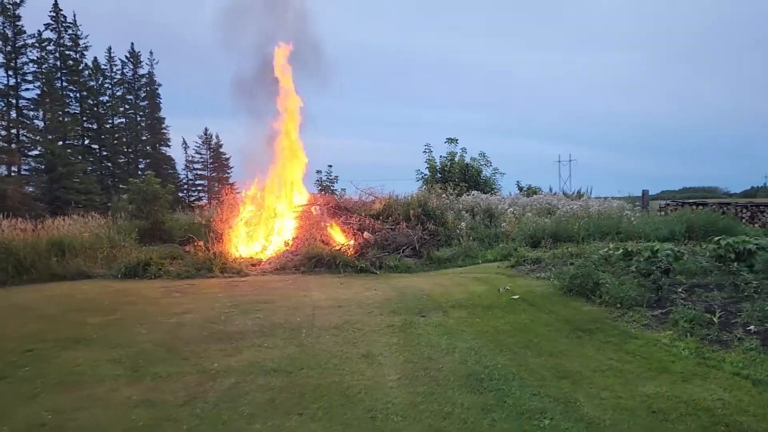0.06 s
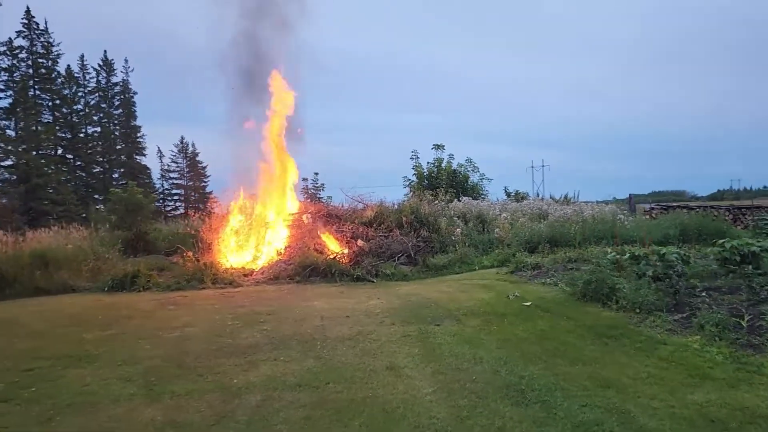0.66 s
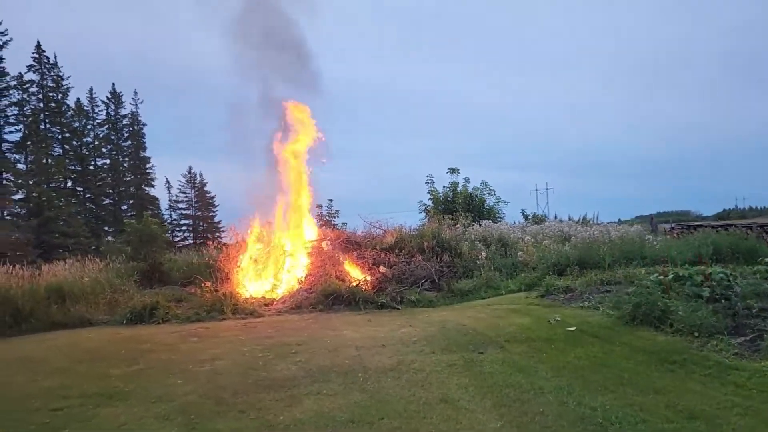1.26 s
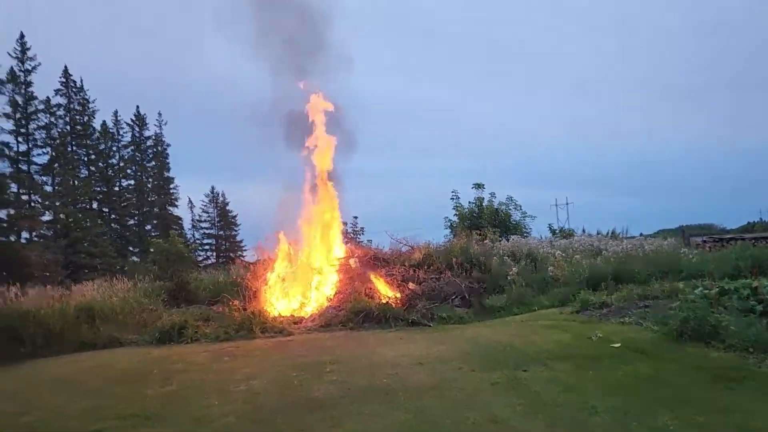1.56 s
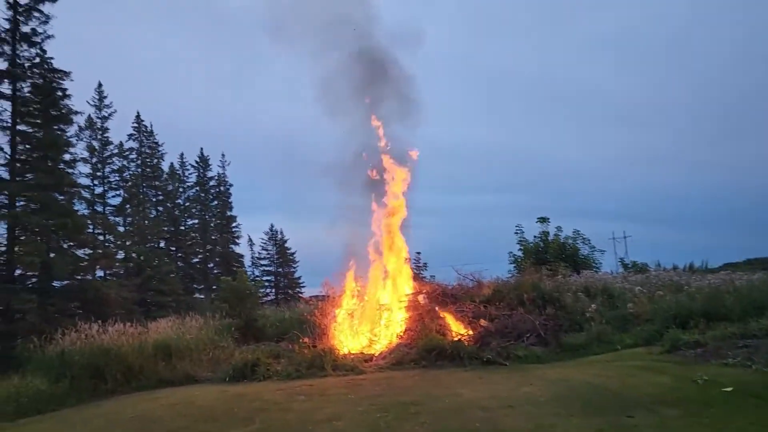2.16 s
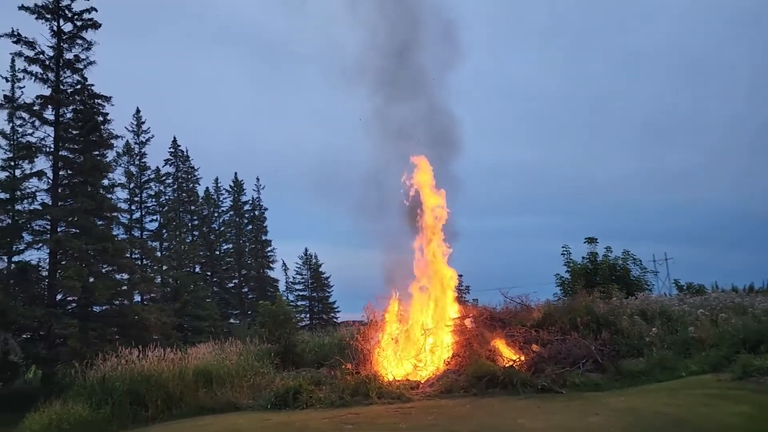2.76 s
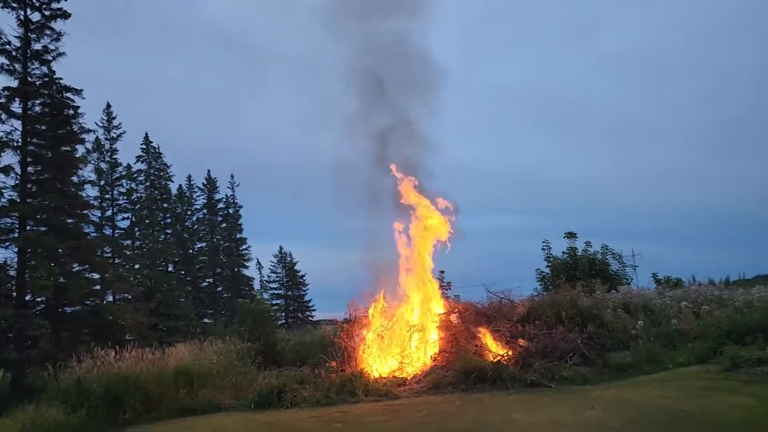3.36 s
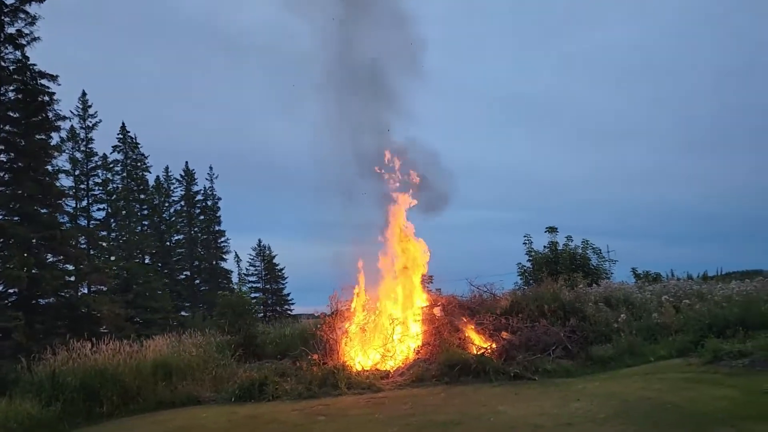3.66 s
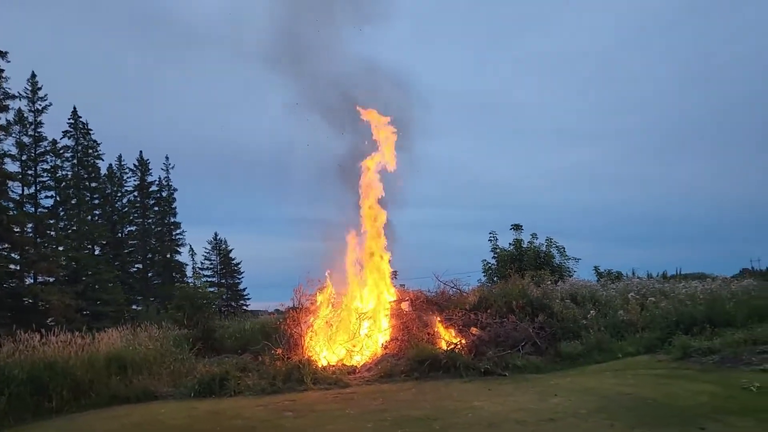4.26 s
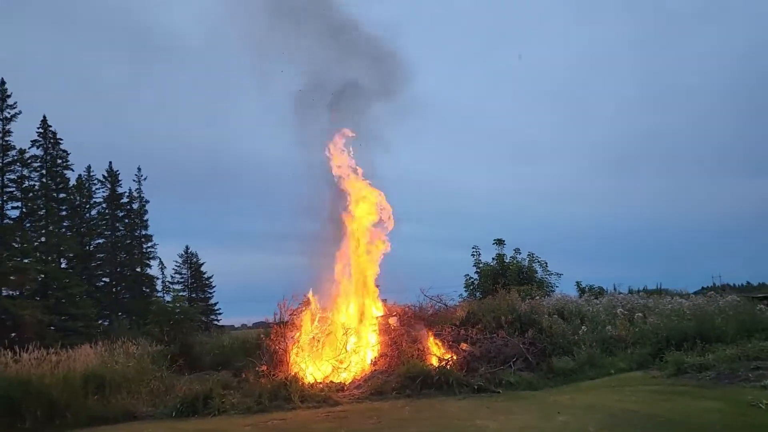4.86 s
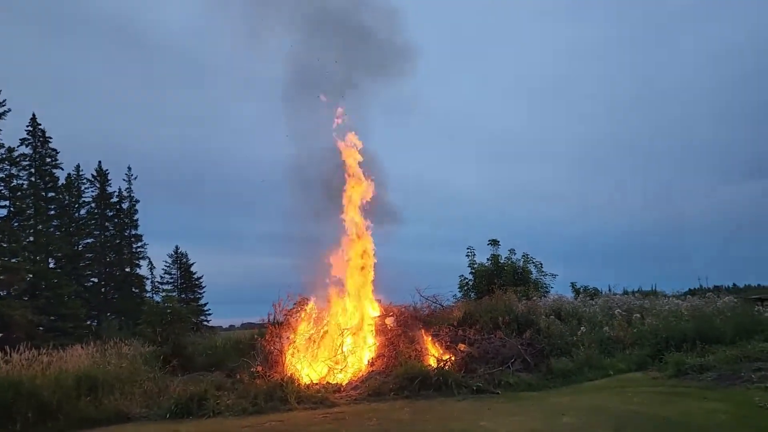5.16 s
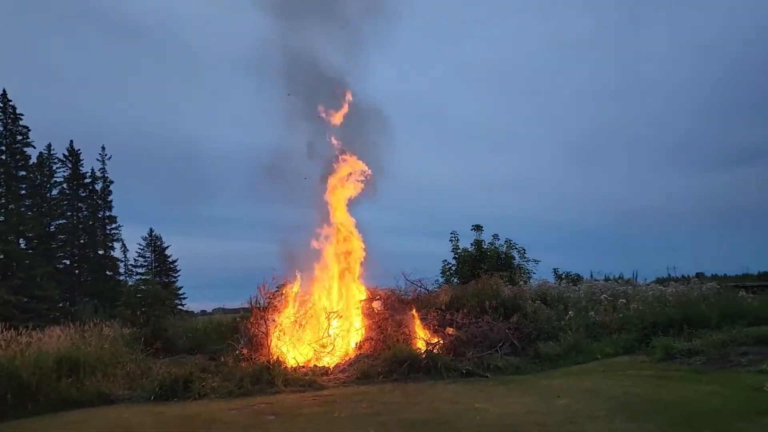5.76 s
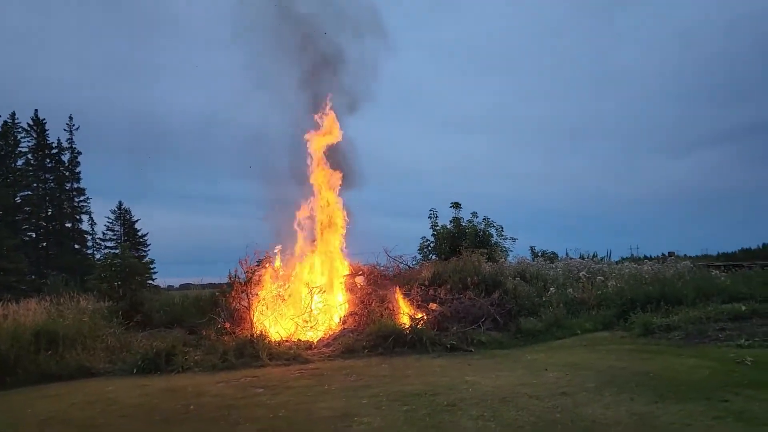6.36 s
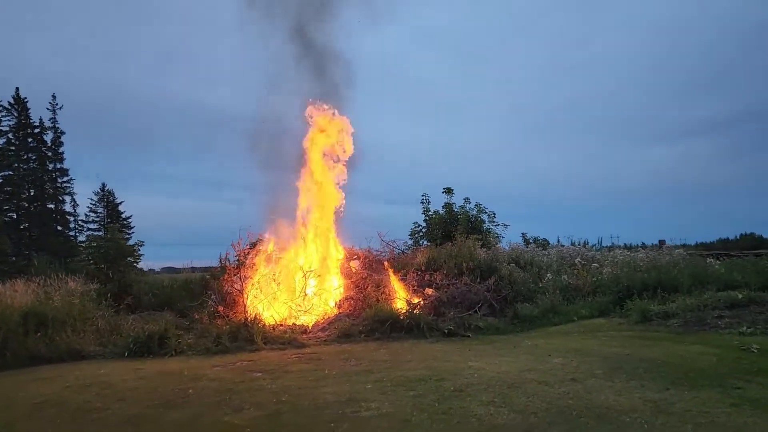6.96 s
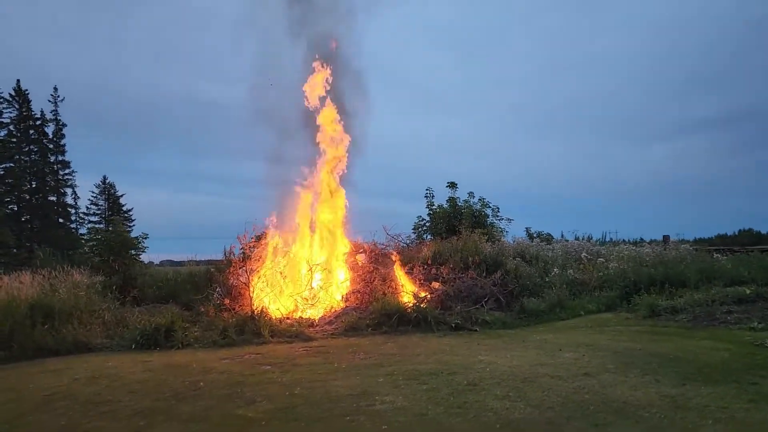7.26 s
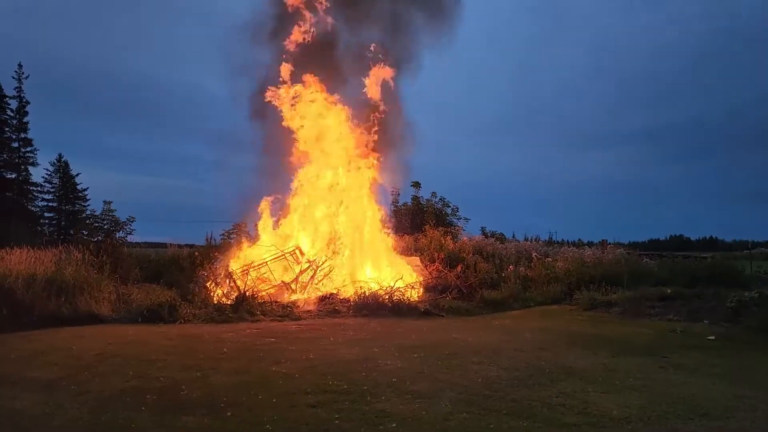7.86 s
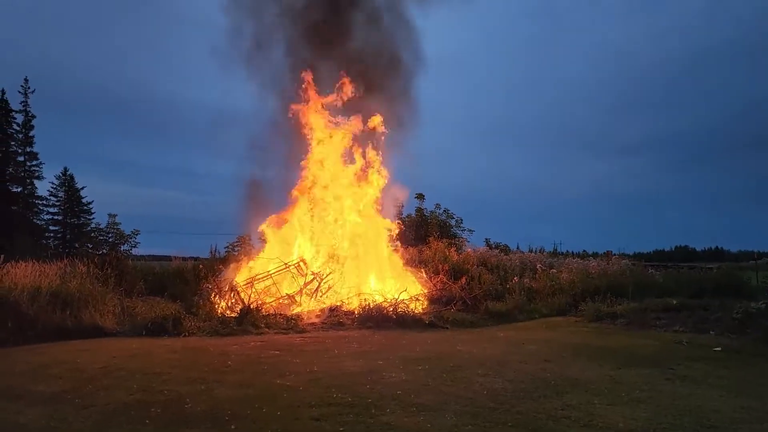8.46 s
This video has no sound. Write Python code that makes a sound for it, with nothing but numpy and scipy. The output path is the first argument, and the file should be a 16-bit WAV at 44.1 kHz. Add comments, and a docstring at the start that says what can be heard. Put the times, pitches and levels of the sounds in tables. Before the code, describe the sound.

Burning wood gives a dense crackle and sizzle with scattered sharp pops, while a soft flame rumble slowly grows.

```python
"""An open lawn: a tall bonfire of branches, some way from a hand-held stereo microphone.
Steam pockets burst the wood in sharp pops over a dense crackle of twigs and a sizzle of sap.
The turbulent flame column rumbles and slowly grows; a light draught stirs at the microphone.
The colour shifts with the microphone's aim. Late on, the sound drops out for an instant."""
import sys
import numpy as np
from scipy import signal
from scipy.fft import rfft, irfft
from scipy.io import wavfile
from scipy.ndimage import uniform_filter1d

SR = 44100
rng = np.random.default_rng(int(sys.argv[2]) if len(sys.argv) > 2 else 0)


def wrap_up_sound(samples):
    """Save the sound to the file named by the first command line argument, as 16-bit audio."""
    columns = np.atleast_2d(samples).T
    # keep every value between -1 and 1, then stretch to whole-number steps
    tamed = np.clip(columns, -1, 1)
    steps = np.round(tamed * 32767).astype(np.int16)
    wavfile.write(sys.argv[1], SR, steps)


N = 384552
EDGE_HZ = 16000
LEAD_S = 0.001205  # faint lead-in starts this long before the crack

# Loudest wood bursts: start_s, level_db (energy over 1 ms), centre_hz,
# below_db_per_oct, above_db_per_oct, ring_share (of energy, 0-1)
STEAM_POPS = [(0.2754, -26, 5300, 18, 22, 0.083), (0.346, -22, 4970, 5, 3.2, 0.55),
              (0.476, -20.5, 4050, .3, 4.4, 0.65), (0.5401, -26, 4150, 16, 5, .3),
              (0.6069, -29, 815, 18, 4.8, 1), (0.635, -16.5, 9300, 10.5, 17, 0.13),
              (0.806, -20, 2880, 16, 2.6, 0.23), (0.954, -19.5, 4470, 7.4, 6.1, .2),
              (1.027, -22, 5100, 4.1, 13, 0.88), (1.2145, -29.5, 665, 9.6, 3.8, 0.75),
              (1.2518, -34, 1320, 9, 11, .3), (1.2731, -26, 4940, 21, 6, .25),
              (1.393, -26.5, 3800, 5, 16, .6), (1.4108, -19, 5400, 7, 7.8, .3),
              (1.433, -21.5, 4560, 9.4, 2.6, .2), (1.614, -22, 4170, 7, 6, 0.75),
              (1.6396, -17.5, 5370, 17, 25, 0.52), (1.6808, -27, 5400, 5, 4, .5),
              (1.872, -34, 1500, 1, 12, .6), (1.9974, -13.5, 4600, 8.4, 9, .72),
              (2.164, -27, 10900, 2.8, 11, .35), (2.316, -31, 3200, 8, 12, .4),
              (2.517, -28, 2050, 15, 4, .3), (2.6511, -19.5, 6440, 3.1, 3.7, 0.71),
              (2.6677, -26, 4940, 4.6, 3, .95), (2.6733, -19, 4560, 6.9, 9, .55),
              (2.821, -30.5, 850, 9.9, 1.8, 0.29), (2.797, -27, 5400, 14, 16, .4),
              (2.9733, -25.5, 9900, 9, 12, .8), (3.0274, -23, 9150, 5.4, 23, .3),
              (3.3245, -27, 4530, 5, 5.3, .35), (3.3682, -28.5, 13000, 3, 3, 0.33),
              (3.438, -30, 11000, 3, 3, .4), (3.665, -27.5, 9150, 2.6, 18, 0.58),
              (3.6987, -19.5, 5340, 3.4, 2.1, 0.75), (3.7532, -26, 8380, 4, 4, .6),
              (3.94, -20, 4550, 5.4, 6, 0.87), (4.03, -24, 4530, 9, 3, .45),
              (4.0602, -26, 4940, 7, 5.5, 0.67), (4.0709, -18.3, 2350, 9, 7, .4),
              (4.232, -24, 5800, 1.5, 14, 0.36), (4.2909, -15, 3750, 5.4, 8.6, 0.14),
              (4.298, -13.5, 6500, 4.6, 7, 0.47), (4.3918, -23, 1440, 7, 2, .7),
              (4.4158, -15.5, 8200, 7.2, 2.2, 0.22), (4.4835, -15, 7500, 2.8, 12, 0.75),
              (4.548, -25.5, 7750, 3.3, 18, .45), (4.6912, -13.5, 4680, 9.7, 7.4, .25),
              (4.7849, -27, 4150, 3, 3, .5), (4.796, -28, 1720, 3, 2.6, 0.95),
              (4.9354, -24, 2050, 15, 3.3, 0.28), (4.9656, -20, 5360, 9.8, 11, .45),
              (4.9804, -22.5, 2920, 6, 6, .7), (4.9918, -17.5, 3800, 14, 20, 0.59),
              (5.0178, -20, 2670, 9.7, 8.1, 0.65), (5.055, -20.5, 2090, 5.8, 3.7, 0.54),
              (5.079, -21.5, 12900, 1.1, 3, .5), (5.1025, -20.5, 6500, 4.2, 11, 0.63),
              (5.2052, -22, 4530, 10, 4.6, 0.23), (5.2428, -22.5, 4150, 6.3, 10, .1),
              (5.2833, -26.5, 1030, 26, 2.5, 0.64), (5.2989, -24.5, 7670, 5, 10, .35),
              (5.348, -22.5, 4940, 3.5, 2.6, 0.18), (5.4038, -21, 1880, 4.7, 2, 0.46),
              (5.5796, -16.5, 4760, 2.5, 1.4, .4), (5.6305, -23, 4530, 1.6, 2.6, .25),
              (5.6745, -25.5, 8380, 3, 14, .45), (5.7539, -29.5, 1720, 5.5, 3, 0.43),
              (5.9167, -15.5, 10800, 3.7, 12, 0.48), (6.077, -25.5, 3190, 8, 3, .55),
              (6.0998, -22, 7100, 4.6, 3, .3), (6.134, -24.5, 1720, 8, 2.6, 0.39),
              (6.1567, -20.5, 3800, 4.6, 4, 0.22), (6.186, -31, 2050, 8, 8, .55),
              (6.4734, -20.3, 4500, 11, 3.3, .45), (6.487, -26, 7030, 4.5, 3, .5),
              (6.602, -27, 1330, 19, 12.4, 0.38), (6.753, -24, 13000, 3, 6, 0.87),
              (6.759, -18.5, 5000, 16, 12, .15), (6.801, -26, 5890, 2, 8, 0.28),
              (6.939, -26.5, 10900, 8.9, 3, 0.42), (6.9508, -31, 1210, 13, 7.9, .75),
              (7.0, -27.5, 9990, 2.6, 11, 0.78), (7.0447, -23.5, 11910, 4.8, 6, 0.55),
              (7.0839, -24.5, 10900, 2, 8, .4), (7.2365, -26.5, 11910, 2.4, 11, 0.43),
              (7.297, -26.5, 4940, 5, 19, .2), (7.545, -20, 10800, 5.3, 22, 0.84),
              (7.6693, -18, 2400, 5, 5, .65), (7.815, -24, 1840, 1.5, 10, .9),
              (8.0245, -23.5, 13000, 4.3, 3, 0.27), (8.217, -20.5, 4840, 5, 10, 0.57),
              (8.2352, -22, 3820, 6.5, 8.5, .4), (8.2802, -28, 600, 5, 2.2, 0.93),
              (8.3183, -20, 3800, 2.6, 3.9, .35), (8.378, -27, 5890, 5, 15, 0.66),
              (8.3938, -26, 600, 2, 1.9, 0.93), (8.4463, -23.5, 5890, 3, 8, .85),
              (8.5022, -22, 2240, 8, 8.2, 0.67)]
def pops():
    """Steam pockets split the wood, with a fainter lead-in than in small fuel."""
    out = np.zeros((2, N))
    for start_s, level_db, *timbre in STEAM_POPS:
        pop = burst(*timbre, crack_s=.00026, bounce_gain=.52, lead_gain=.14)
        add(out, start_s - LEAD_S, amp(level_db) * pop)
    return out


# Right port's phase lag behind the left, from the microphone body: freq_hz, lag_rad
PORT_PHASE = [(100, -1.5), (780, 1), (1600, 1.75), (2000, 1), (2800, 1.06), (3300, 1.55), (4400, 3),
              (6000, 5.5), (7800, 6.5), (9000, 8.5), (15500, 15)]
def burst(centre_hz, below_db_per_oct, above_db_per_oct, ring_share, crack_s=.00025, ring_s=.0026,
          bounce_s=.0028, bounce_gain=.69, mode_gain=.22, lead_gain=.26, size=2048):
    """A crack, its ground bounce and a splintering ring; the energy of 1 ms at rms 1."""
    t, hz = np.arange(size) / SR, np.fft.rfftfreq(size, 1 / SR)
    age_s = np.maximum(t - LEAD_S, 0)
    share = np.clip(ring_share, .02, .98)
    grit = rng.standard_normal((5, size))
    apart = np.clip(hz / 8500, 0, .85)  # ports agree less on short waves
    bearing = rng.uniform(.73, 1.17)  # place in the pile
    lag = np.exp(-1j * bearing * spectrum(PORT_PHASE, hz) * np.array([[0], [1]]))
    tear_s = crack_s * (.5 + share)  # splintery wood tears more slowly
    lead_in = lead_gain * np.exp(-2 * abs(t - LEAD_S) / LEAD_S)
    tear = (age_s / tear_s) ** 2 * np.exp(-age_s / tear_s)
    cracks = rfft(grit[:3] * (lead_in + tear))
    crack = cracks[0] * lag * np.sqrt(1 - apart ** 2) + cracks[1:] * apart
    crack *= 1 + bounce_gain * np.exp(-2j * np.pi * hz * bounce_s * rng.uniform(.8, 1.2))
    ring_envelope = np.exp(-age_s / ring_s) * (1 - np.exp(-age_s / tear_s)) ** 2
    splinters = rfft(unit_rms(grit[3:] * ring_envelope))
    crossfeed = splinters[::-1] / (1 + (hz / 900) ** 2)
    ring = (splinters + crossfeed + mode_gain * rfft(stick_modes(age_s, centre_hz))) * lag
    two_sided_hz = abs(np.fft.fftfreq(size, 1 / SR))
    colour_db = wood_db(two_sided_hz, centre_hz, below_db_per_oct, above_db_per_oct)
    log_gain = np.log(amp(np.maximum(colour_db, -90)))
    colour = np.exp(np.conj(signal.hilbert(log_gain)))[:, :len(hz)]  # minimum phase: no pre-ring
    sound = np.sqrt(1 - share) * unit_rms(irfft(crack * colour))
    sound += np.sqrt(share) * unit_rms(irfft(ring * colour))
    return unit_rms(sound) * np.sqrt(SR / 1000 / size)


def stick_modes(t, centre_hz, decay_s=.0032, count=4):
    """A few quickly damped modes, different in every stick."""
    mode_hz = np.minimum(centre_hz * 2 ** rng.normal(0, .302, (count, 1)), EDGE_HZ)
    return unit_rms(np.sum(np.sin(2 * np.pi * mode_hz * t) * np.exp(-t / decay_s), axis=0))


# Treble response of the microphone ports: freq_hz, left_db, right_db
PORT_RESPONSE = [(940, -1, -1), (1270, -3, -4), (1510, -2.5, -1), (1710, -4, -4), (2710, -2, 0),
                 (3180, 1, 3), (4480, 1, 8.5), (6200, 1, 2), (7600, 0.5, 6.5), (8350, 3, 4), (9600, -2, -8),
                 (10900, -4, -2), (12170, 2, 1), (15900, 1.5, -2)]
def wood_db(hz, centre_hz, below_db_per_oct, above_db_per_oct):
    """One broad spectral hump, lower for thicker wood, as each port hears it."""
    octaves = np.log2((hz + 1) / centre_hz)
    away = np.hypot(octaves, .3)  # rounds the top
    fall_db = below_db_per_oct * (away - octaves) / 2 + above_db_per_oct * (away + octaves) / 2
    low_cut_db = 10 * np.log10(1 + (320 / (hz + 1)) ** 4)
    return spectrum(PORT_RESPONSE, hz) - fall_db - low_cut_db


def snaps(per_s, top_db, range_db, centre_hz, spread_oct, fall_db_per_oct=6):
    """Lesser bursts, one at random in each time slot, each from wood of its own thickness."""
    out = np.zeros((2, N))
    for slot, (when, softness, thinness, narrowness, splintering) in enumerate(rng.random((200, 5))):
        hz = centre_hz * 2 ** (spread_oct * (2 * thinness - 1))
        slope = fall_db_per_oct * (.5 + narrowness)
        snap = burst(hz, slope, slope, ring_share=.33 + .52 * splintering)
        add(out, (slot + when) / per_s, amp(top_db - range_db * softness) * snap)
    return out


def crackle(level_db, low_hz, high_hz, fall_db_per_oct, per_s, spread_db, sizzle_db, flare_db, count=32):
    """Tiny bursts of one size of fuel, in flurries, over the sizzle of its sap."""
    sizes = amp(spread_db * np.minimum(rng.exponential(1, N), 3))
    sizes *= rng.random(N) < per_s / SR
    kind = rng.integers(0, count, N)
    slopes = (fall_db_per_oct, fall_db_per_oct)
    shapes = [burst(hz, *slopes, rng.uniform(.13, .86)) for hz in np.geomspace(low_hz, high_hz, count)]
    ticks = np.zeros((2, N))
    for at in np.flatnonzero(sizes):
        add(ticks, at / SR, sizes[at] * shapes[kind[at]])
    sizzle = amp(sizzle_db) * noise(lambda hz: wood_db(hz, np.sqrt(low_hz * high_hz), *slopes))
    return unit_rms(unit_rms(ticks) + sizzle) * amp(level_db + flare_db * flicker(3.3, 40))


# Crackle strength as fine fuel catches and burns off: time_s, twigs_db, needles_db
FUEL_LEVELS = [(0, -51, -49), (.5, -47, -45.5), (1.4, -45.5, -47), (2.0, -47, -51.5), (3.0, -46, -47),
               (3.4, -48.5, -48.5), (4.4, -42.5, -46), (4.75, -45.5, -49), (5.7, -43.5, -45),
               (6.3, -45, -45), (7.2, -44.5, -44), (8.72, -47, -44.5)]
def small_fuel():
    """Sticks, twigs and needles crackle; the finer the fuel, the higher and denser."""
    sticks_db = growth_db(start_db=-58, rise_db=4, ease=.4)
    twigs_db, needles_db = curves(FUEL_LEVELS)
    sticks = crackle(sticks_db, low_hz=928, high_hz=2870, fall_db_per_oct=12.5,
                     per_s=200, spread_db=3.5, sizzle_db=-2.5, flare_db=3)
    twigs = crackle(twigs_db, low_hz=3310, high_hz=6170, fall_db_per_oct=5,
                    per_s=310, spread_db=4.1, sizzle_db=-8, flare_db=1.8)
    needles = crackle(needles_db, low_hz=6820, high_hz=13730, fall_db_per_oct=6.5,
                      per_s=360, spread_db=5.5, sizzle_db=-8, flare_db=1.77)
    return sticks + twigs + needles


# Flame rumble spectrum: freq_hz, relative_db
RUMBLE_SPECTRUM = [(15, -26), (28, -8.5), (42, -1.5), (65, 0), (95, 0), (140, -2.5), (190, -7), (250, -15),
                   (340, -22.5), (600, -40)]
# Flame rush spectrum: freq_hz, relative_db
RUSH_SPECTRUM = [(120, -27), (250, -1.5), (400, 0.5), (600, 1.5), (800, -3.5), (1000, -3), (1300, -14.5),
                 (2500, -8)]
def flame(puff_db=.82, rumble_width=.016, rush_width=.28):
    """Turbulent burning gas: a near-mono rumble and a wider rush, both growing."""
    puffs = amp(puff_db * flicker(2, 14))
    sides = np.array([[1], [-1]])
    low, low_side = noise(lambda hz: spectrum(RUMBLE_SPECTRUM, hz))
    high, high_side = noise(lambda hz: spectrum(RUSH_SPECTRUM, hz) - 10 * np.log10(1 + (hz / 3000) ** 4))
    rumble = (low + rumble_width * sides * low_side) * amp(growth_db(-43.5, rise_db=4.5, ease=1.1))
    rush = (high + rush_width * sides * high_side) * amp(growth_db(-63.3, rise_db=10.3, ease=.53))
    return puffs * (rumble + rush)


def breeze(level_db=-66, corner_hz=70, gust_db=3):
    """A light draught stirs at each port separately."""
    stir = noise(lambda hz: -10 * np.log10((1 + (hz / corner_hz) ** 4) * (1 + (20 / (hz + 1)) ** 4)))
    return stir * amp(level_db + gust_db * flicker(.31, 4.5))


def scatter(x, wet_db, t60_s=.2):
    """Brush pile and trees throw back a thin, short tail."""
    t = np.arange(SR // 2) / SR
    taps = rng.standard_normal((2, len(t))) * (rng.random((2, len(t))) < .05)
    taps *= amp(-60 * t / t60_s) * (t > .004)
    taps /= np.linalg.norm(taps, axis=1, keepdims=True)
    return x + amp(wet_db) * signal.oaconvolve(x, taps, axes=1)[:, :N]


# Bands coloured by the aim: centre_hz
AIM_BANDS_HZ = (385, 590, 950, 2350, 3500, 5400, 7700)
# Three held microphone aims: start_s, end_s, then gain_db for each band
AIM_HOLDS = [(0, 1.6, 3, -4.5, -.5, -0.082, -4, 3, -1.5), (2.4, 7.4, -.5, 1, 1, -0.51, 0, -0.2, 1.31),
             (7.5, 8.72, -2, 1.5, -2.5, 2.1, 0.5, 0, -1.2)]
def microphone_aim(x, q=5.7):
    """Ports and ground colour each aim differently; the colour glides between holds."""
    held = [(s, *gains_db) for start_s, end_s, *gains_db in AIM_HOLDS for s in (start_s, end_s)]
    bands = [signal.lfilter(*signal.iirpeak(hz, q, fs=SR), x) for hz in AIM_BANDS_HZ]
    return x + sum((amp(db) - 1) * band for db, band in zip(curves(held), bands))


def growth_db(start_db, rise_db, ease):
    """Level of a layer swelling with the fire; ease under 1 rises early."""
    return start_db + rise_db * np.linspace(0, 1, N) ** ease


def flicker(slow_hz, fast_hz, count=30):
    """Random wander at rms 1."""
    t = np.linspace(0, N / SR, 2000)
    rates_hz = np.geomspace(slow_hz, fast_hz, count)
    wave = sum(np.sin(2 * np.pi * (hz * t + rng.random())) / np.sqrt(hz) for hz in rates_hz)
    return np.interp(np.arange(N) / SR, t, unit_rms(wave))


def noise(colour_db):
    """Two independent noise channels, shaped by colour_db(hz)."""
    hz = np.fft.rfftfreq(N, 1 / SR)
    return unit_rms(irfft(rfft(rng.standard_normal((2, N))) * amp(colour_db(hz)), N))


def spectrum(rows, hz):
    """Table columns interpolated over log frequency."""
    freq_hz, *columns = np.transpose(rows)
    return np.array([np.interp(np.log(hz + 1), np.log(freq_hz + 1), column) for column in columns])


def curves(rows):
    """Table columns interpolated at every sample."""
    time_s, *columns = np.transpose(rows)
    return [np.interp(np.arange(N) / SR, time_s, column) for column in columns]


def add(mix, start_s, sound):
    """Mixes in a stereo sound."""
    part = mix[:, max(round(start_s * SR), 0):][:, :sound.shape[1]]
    part += sound[:, :part.shape[1]]


def amp(db):
    """Decibels to gain."""
    return 10 ** (np.asarray(db) / 20)


def unit_rms(x):
    """Scales to rms 1."""
    return x / np.sqrt(np.mean(x ** 2) + 1e-20)


def scene():
    """Pops, snaps and crackling fuel over flame and breeze."""
    crackling = small_fuel()
    thin = snaps(per_s=9, top_db=-27.5, range_db=4, centre_hz=6920, spread_oct=.9)
    thick = snaps(per_s=2.5, top_db=-31, range_db=4.5, centre_hz=1500, spread_oct=.91)
    thick *= amp(growth_db(-6.5, rise_db=4.5, ease=.8))
    outer = scatter(pops() + thin + thick, wet_db=-13.5)
    inner = scatter(crackling, wet_db=-8.5)  # small fuel lies deep in the pile
    return microphone_aim(outer + inner + flame()) + breeze()


# Drop-out: start_s, end_s
DROPOUT_S = (7.453, 7.485)
def record(dry, dropout_db=-32):
    """Brief drop-out, then the band limit."""
    t = np.arange(N) / SR
    start_s, end_s = DROPOUT_S
    gain = uniform_filter1d(np.where((t > start_s) & (t < end_s), amp(dropout_db), 1.), size=60)
    lowpass = signal.firwin(255, EDGE_HZ, window=("kaiser", 9), fs=SR)
    return signal.oaconvolve(dry * gain, lowpass[None], "same")


dry = scene()
out = record(dry)
wrap_up_sound(out)
```